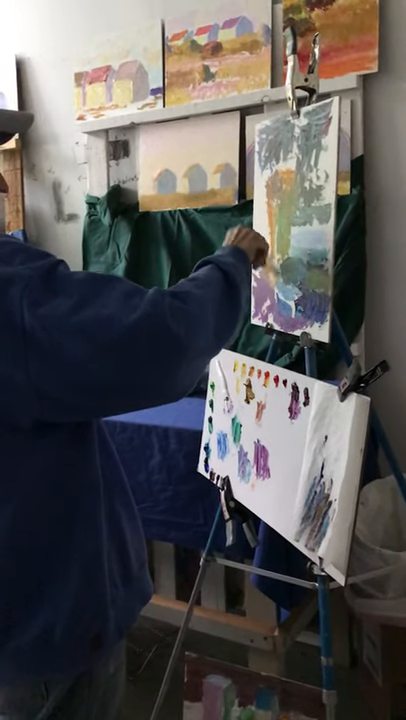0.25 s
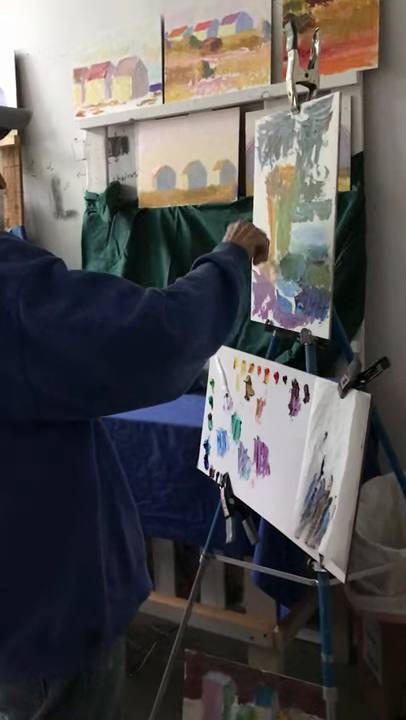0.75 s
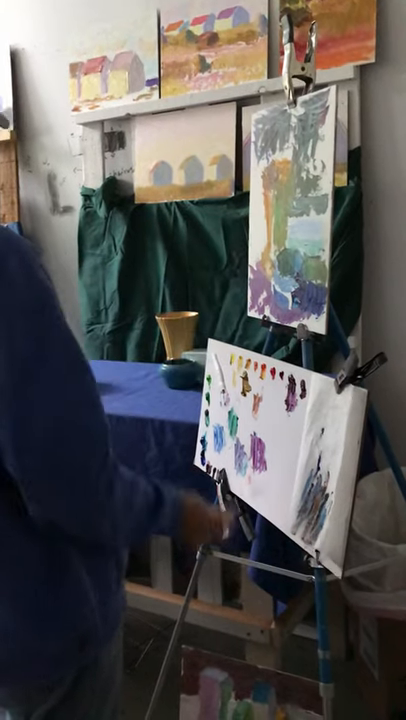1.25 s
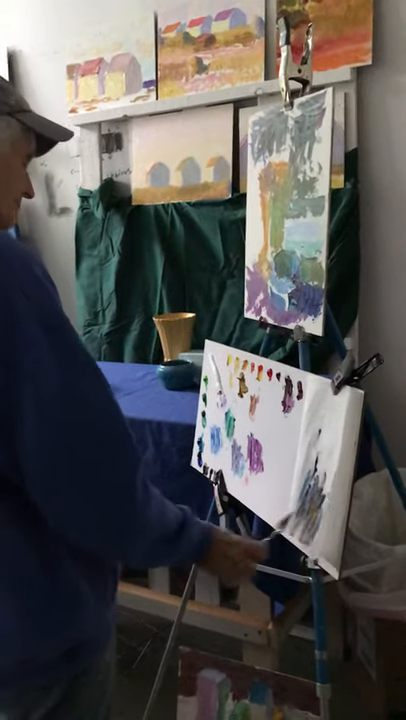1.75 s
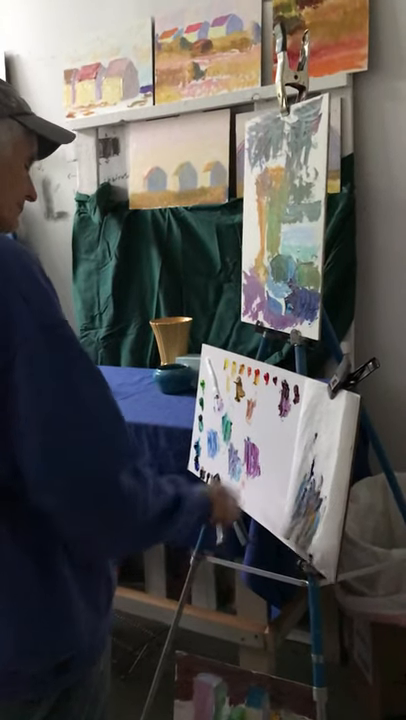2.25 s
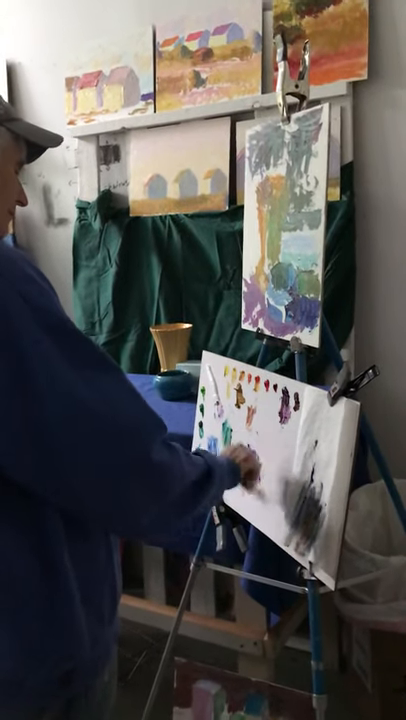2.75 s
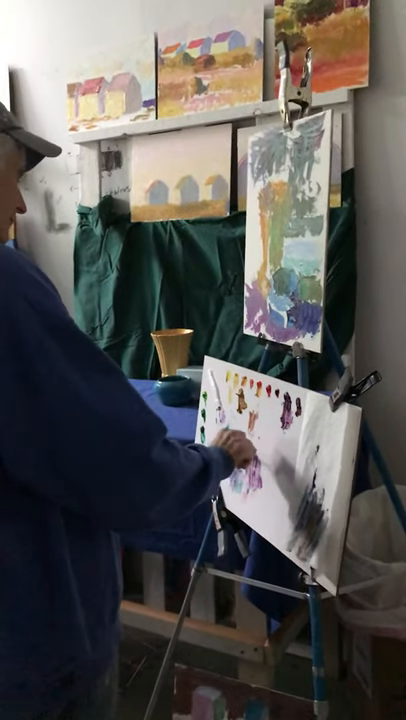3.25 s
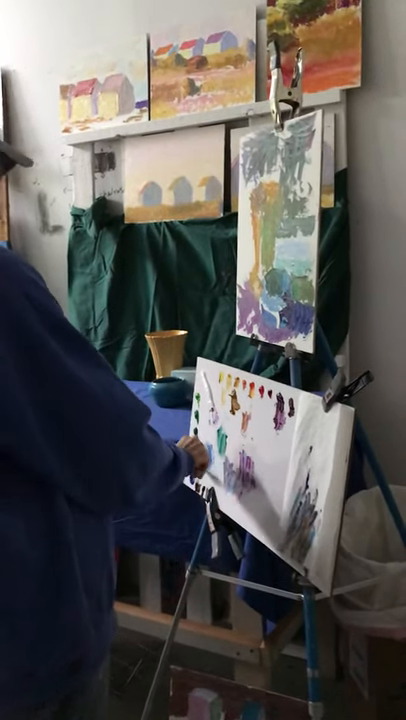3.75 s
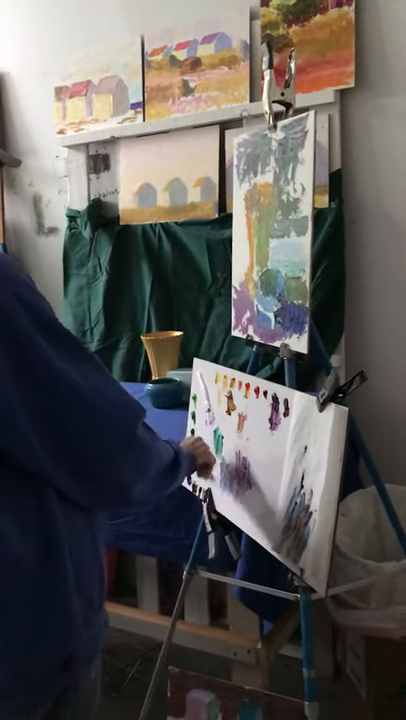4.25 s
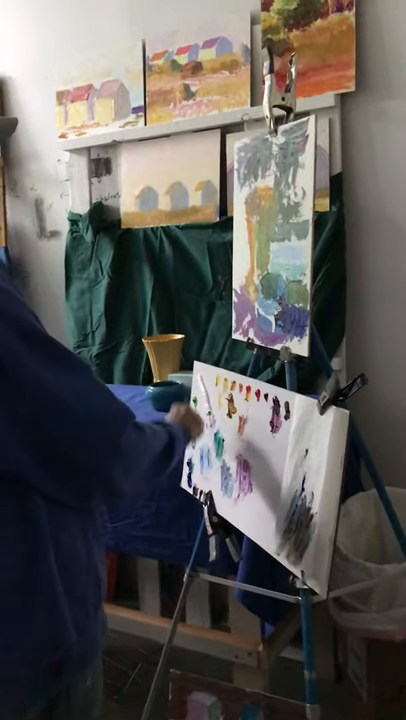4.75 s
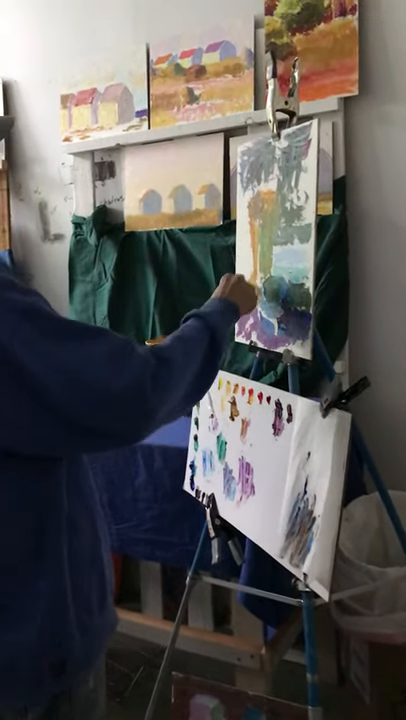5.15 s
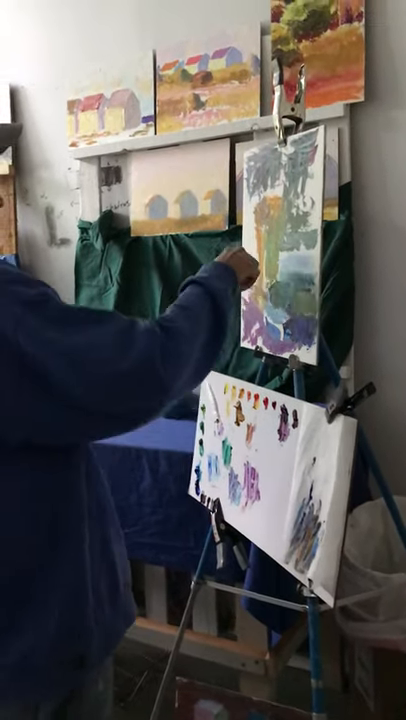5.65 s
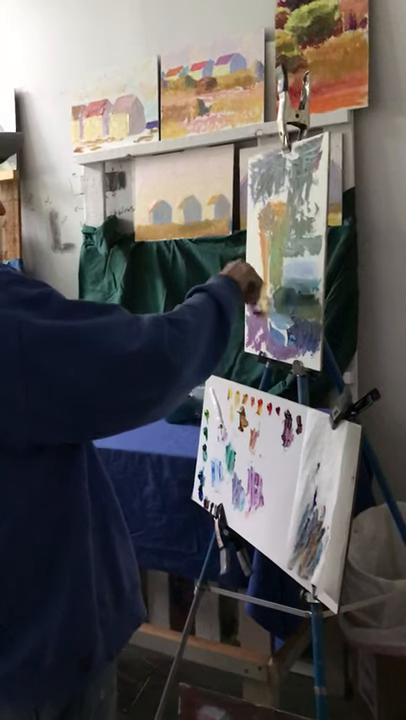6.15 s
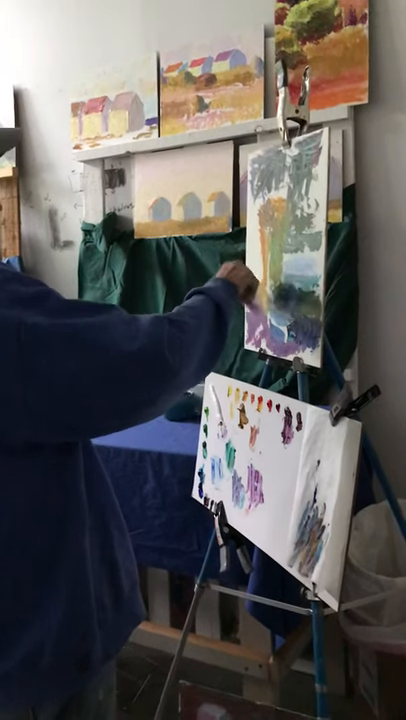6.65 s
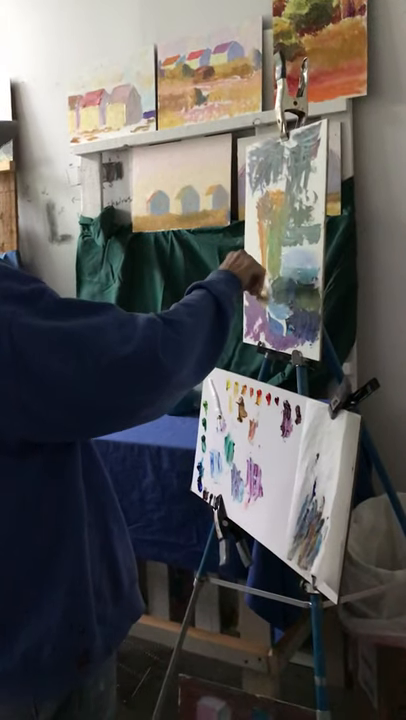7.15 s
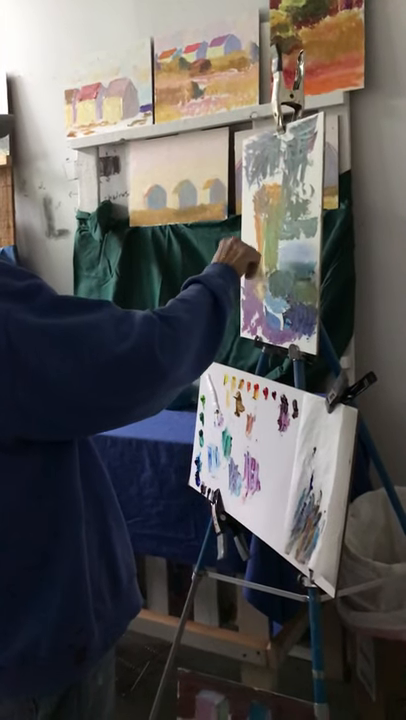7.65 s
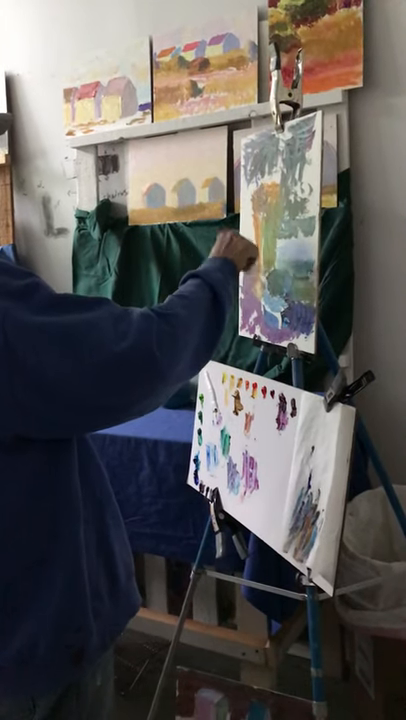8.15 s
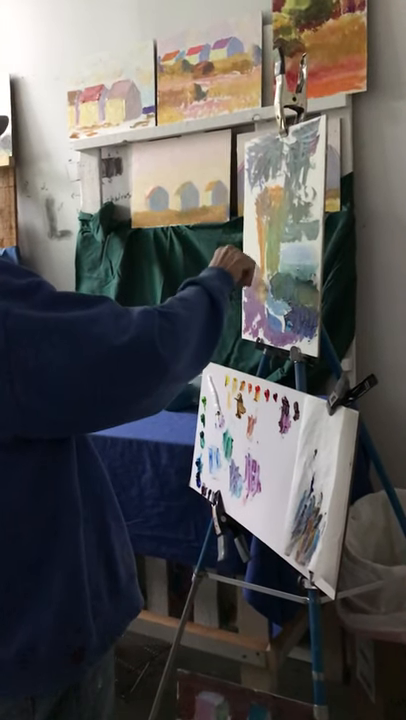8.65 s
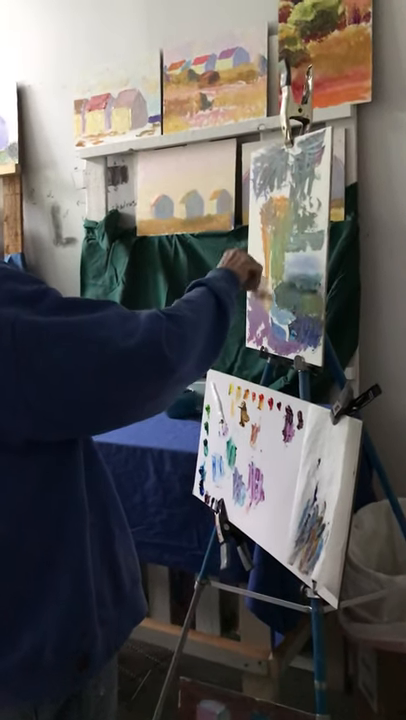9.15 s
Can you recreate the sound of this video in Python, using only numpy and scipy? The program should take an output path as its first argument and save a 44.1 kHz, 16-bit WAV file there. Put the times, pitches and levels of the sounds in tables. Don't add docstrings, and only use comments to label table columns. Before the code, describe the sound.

Dry scratchy painting strokes, each a small snap followed by a brief rasp, heard from about two metres on a phone in a small lightly reverberant room. A first quick run, near silence, one hard bright knock with a short rattle, quiet palette dabs, then a long regular run on canvas that softens, pauses and ends weakly. Steady soft air noise and low hum underneath.

```python
import sys
import numpy as np
from scipy import signal
from scipy.fft import rfft, irfft, next_fast_len
from scipy.io import wavfile
from scipy.ndimage import uniform_filter1d

SR = 44100
rng = np.random.default_rng(int(sys.argv[2]) if len(sys.argv) > 2 else 0)


def how_loud(loudness_db):
    steps = np.asarray(loudness_db, float) / 20
    return 10 ** steps


def generate_wav(signal):
    frames = np.transpose(np.atleast_2d(signal))
    scaled = np.clip(frames, -1, 1) * 32767
    pcm = np.round(scaled).astype(np.int16)
    wavfile.write(sys.argv[1], SR, pcm)


N = 414099
BANDS_HZ = 280 * 2 ** np.arange(0, 6, 1 / 3)
PATCHES_HZ = np.append(280 * 2 ** np.arange(0, 3.4, 1 / 3), np.arange(3500, 17000, 750))
STEP = 16
LONGEST = SR // 2


def on_log(hz, table):
    points_hz, values = np.transpose(table)
    return np.interp(np.log(hz), np.log(points_hz), values)


def band(x, hz, width):
    g = 1 / (1 + np.tan(np.pi * width / SR))
    return signal.lfilter([1 - g, 0, g - 1], [1, -2 * g * np.cos(2 * np.pi * hz / SR), 2 * g - 1], x)


def steep(x, hz, width):
    return band(band(x, hz, 1.55 * width), hz, 1.55 * width)


def unit(x):
    return x / np.sqrt(np.mean(x ** 2))


def even(x):
    size = 2 * len(x)
    spec = rfft(x, size)
    power = np.abs(spec) ** 2
    fine = uniform_filter1d(power, int(150 * size / SR))
    broad = uniform_filter1d(power, int(1200 * size / SR))
    return irfft(spec * np.sqrt(broad / fine))[:len(x)]


def walk(rate, size):
    k = int(SR / rate)
    held = np.repeat(rng.standard_normal(size // k + 1), k)
    return uniform_filter1d(uniform_filter1d(held, k), k)[:size]


def tilt(hz, low_db, high_db):
    low_share = np.interp(np.log(hz), np.log([1900, 3200]), [1, 0])
    high_share = np.interp(np.log(hz), np.log([7500, 11000]), [0, 1])
    return low_db * low_share + high_db * high_share


def add(track, s, x):
    i = max(int(s * SR), 0)
    track[i:i + len(x)] += x[:len(track) - i]


# frequency in Hz, level in dB per Hz.
AIR_COLOUR = [(20, -25.5), (31, 1.5), (42, 7), (62, -3.5), (80, 1.5), (120, -0.5), (260, 3), (420, -3),
              (800, -3), (1350, -0.5), (1900, -5), (4000, -13), (8000, -21.5), (15500, -31.5)]
# time in seconds, level in dB.
AIR_LEVEL = [(0.0, -56.5), (0.42, -54.5), (1.39, -59.5), (3.32, -56.5), (5.2, -57), (5.93, -56),
             (6.61, -58), (7.56, -57), (8.42, -58.5), (9.39, -57)]
# time in seconds, level in dB.
HUM_LEVEL = [(0.0, -58.5), (5.7, -57), (6.1, -60), (9.39, -59)]


def air():
    t, size = np.arange(N) / SR, next_fast_len(N)
    hz = np.maximum(np.fft.rfftfreq(size, 1 / SR), 1)
    spec = rfft(rng.standard_normal(size)) * how_loud(on_log(hz, AIR_COLOUR)) * (hz > 15)
    noise = irfft(spec, size)[:N]
    noise_db = np.interp(t, *np.transpose(AIR_LEVEL)) + 3.0 + 0.13 * walk(8.4, N)
    motor_hz = 53.2 + 2.56 * walk(5.3, N)
    hum = np.sin(2 * np.pi * np.cumsum(motor_hz) / SR)
    hum_db = np.interp(t, *np.transpose(HUM_LEVEL)) + 2 * walk(6.0, N) + 1.49 * walk(15, N)
    return unit(noise) * how_loud(noise_db) + hum * how_loud(hum_db)


# frequency in Hz, time to fall 60 dB in seconds.
ROOM_T60 = [(300, 0.64), (1500, 0.38), (4000, 0.51), (9000, 0.23), (15000, 0.092)]


def room(x, gap_s=0.00043):
    t = np.arange(int(.6 * SR)) / SR
    noise = rng.standard_normal(len(t)) * np.clip((t - gap_s) / 0.0023, 0, 1)
    tail = sum(band(noise, hz, hz / 3) * 1000. ** (-t / on_log(hz, ROOM_T60)) for hz in BANDS_HZ)
    tail = even(tail)
    return signal.fftconvolve(x, tail / np.sqrt(np.sum(tail ** 2)))[:N]


# time in seconds, peak in dB, centre in Hz.
THUDS = [
    (0.197, -46, 383),
    (0.889, -52.5, 350),
    (6.639, -49.5, 320),
    (8.85, -52, 178),
]


def thuds(swell_s=0.053, width=100.0):
    out, t = np.zeros(N), np.arange(SR // 4) / SR
    swell = t / swell_s * np.exp(1 - t / swell_s)
    for s, db, hz in THUDS:
        rumble = unit(band(rng.standard_normal(len(t)), hz, width))
        add(out, s - swell_s / 2, how_loud(db - 6.5) * rumble * swell)
    return out


# time in seconds, peak in dB.
KNOCK = [
    (2.015, -13.5),
]
# frequency in Hz, width in Hz, level in dB.
TRAY_MODES = [(735, 61, -7), (1270, 77, -4), (1720, 160, 3.5), (2840, 79, 6), (2960, 90, -3), (2900, 99, 7),
              (3120, 108, 10), (4020, 260, 3.5), (4350, 70, -5), (6050, 120, -4), (6520, 200, -4),
              (8400, 96, 0), (10900, 360, -3)]
# frequency in Hz, level in dB per Hz.
TRAY_CRACK = [(300, -30), (700, -8), (1500, -11), (2250, -6), (3000, -24), (5000, -7), (9000, -3.5),
              (16000, 7)]


def knock(rattle_s=0.013, tail_s=0.0015, shake_s=0.024, shake_db=-9.0, modes_db=-2.5, gain_db=4.0):
    out, t = np.zeros(N), np.arange(SR // 2) / SR
    blow = 1.3 * np.exp(-t / 0.0023)
    blow += np.exp(-t / 0.016 - np.maximum(t - rattle_s, 0) / tail_s)
    blow += how_loud(shake_db) * np.exp(-t / shake_s)
    rattle = even(rng.standard_normal(len(t)) * np.minimum(t / 0.0015, 1) ** 2 * blow)
    crack = sum(how_loud(on_log(hz, TRAY_CRACK)) * band(rattle, hz, hz / 3) for hz in BANDS_HZ)
    modes = sum(how_loud(db) * band(rattle, hz, w) for hz, w, db in TRAY_MODES)
    sound = unit(crack) + how_loud(modes_db) * unit(modes)
    for s, db in KNOCK:
        add(out, s - .001, how_loud(db + gain_db) * sound / np.abs(sound).max())
    return out


# time in seconds, peak in dB, strongest ring in Hz, lows in dB, highs in dB.
TICKS = [(0.1564, -26.5, 4450, -10.5, -18), (0.3856, -24, 4100, -8, -17), (0.629, -30.5, 4310, -16, -20),
         (0.8616, -24, 3600, -10, -16), (2.5381, -27.5, 4030, -8, -20), (2.834, -31, 8150, -13, -22),
         (3.1993, -25.5, 3900, -11, -21), (3.9684, -35.5, 4510, -9, -14), (4.3044, -32, 4310, -16, -15),
         (4.611, -25, 6100, -22, -12), (5.8745, -31, 5910, -23, -13.5), (6.13, -23.5, 4310, -36, -15),
         (6.3605, -30, 4310, -11, -10), (6.6004, -26.5, 4350, -23, -10), (6.8565, -23, 4310, -25, -30),
         (7.093, -34, 3060, -2, -17), (7.3304, -37, 2990, -2, -25), (7.6066, -37, 3620, -12, -29),
         (7.8176, -41, 2990, -19, -21), (8.061, -38, 5610, -9, -23), (9.0756, -30, 4310, -17, -17),
         (9.3507, -37, 2860, -45, -22)]
# time in seconds, peak in dB, ring in Hz, lows in dB, highs in dB.
LIFTS = [(1.664, -48, 2910, -20, -28), (1.8063, -48.5, 2990, -2, -17), (1.985, -47.5, 2920, -24, -6),
         (2.7384, -45.5, 6150, -16, -18), (3.0612, -40.5, 5700, -12, -20), (4.1987, -43.5, 5380, -6, -17),
         (5.1484, -55, 3520, -10, -15), (5.2916, -39, 5400, -6, -16.5), (5.5384, -50, 3260, -12, -17),
         (6.2687, -44, 4340, -10, -24), (6.5084, -40, 4350, -21, -20), (7.2327, -32.5, 3040, -9, -29),
         (7.465, -41.5, 5640, -10, -26), (7.7059, -32.5, 4380, -17, -22), (7.9513, -45, 4340, -7, -12),
         (8.0883, -41, 2990, 0, -25), (8.201, -51, 3630, -11, -16), (8.955, -40.5, 3570, 2, -22),
         (9.2356, -36, 2990, -9, -17)]
# frequency in Hz, width in Hz, level in dB.
LATER_MODES = [(1493, 50, -10), (1735, 60, 3.5), (1897, 60, 9), (2420, 130, 11), (3060, 93, 9),
               (3690, 31, 5.5), (4310, 48, 1), (5640, 73, -16)]


def ticks(table, contact_s, gain_db, ring_db):
    out, t = np.zeros(N), np.arange(1300) / SR
    touch_s = .0007
    for s, db, ring_hz, low_db, high_db in table:
        lows, highs = low_db + 8.5, high_db + 17.5
        contact = rng.standard_normal(len(t)) * np.sqrt(t) * np.exp(-1.5 * t / contact_s)
        contact = unit(contact) + how_loud(24.5) * (np.abs(t - touch_s) < .5 / SR)
        spot_db = 4.5 * rng.standard_normal(len(PATCHES_HZ)) + tilt(PATCHES_HZ, lows, highs)
        spot_db -= 16.0 * np.clip(PATCHES_HZ / 4000 - 3, 0, 1)
        crack = sum(how_loud(g) * steep(contact, hz, min(hz / 3, 1000))
                    for g, hz in zip(spot_db, PATCHES_HZ) if hz > 1300)
        blade = sum(how_loud(g + tilt(hz, lows, 0)) * band(contact, hz, 220) for hz, _, g in LATER_MODES)
        ring = band(contact, ring_hz, 300)
        tick = unit(crack) + how_loud(-13.5) * unit(blade) + how_loud(ring_db) * unit(ring)
        add(out, s - touch_s, how_loud(db + gain_db) * tick / np.abs(tick).max())
    return out


# level in dB, board lows in dB, tip highs in dB, share of bend from 0 to 1.
STROKE_SHAPE = [
    (-12.5, -2.5, -1, 0),
    (2.5, -7.5, -1.5, 0.71),
    (0, -5.5, -0.5, 1),
    (-24.5, -16, -42, 0),
]


def stroke(row, stop_s, straight_tip_hz=5700):
    start_s, rise_s, hold_s, db, tip_hz = row
    level_db, lows, highs, bend = np.transpose(STROKE_SHAPE)
    s = start_s + np.cumsum([0, rise_s, hold_s, stop_s])
    return s, db + level_db, lows, highs, straight_tip_hz + bend * (tip_hz - straight_tip_hz)


def drag(points, modes, colour, ring_db, low_db, high_db, tip_db, tip_width=900., patchy_db=2.4):
    s, level_db, lows, highs, tip_hz = points
    t = np.arange(s[0], s[-1], 1 / SR)
    slow_t = t[::STEP]
    lows = np.interp(slow_t, s, np.minimum(lows - low_db, 11))
    highs = np.interp(slow_t, s, highs - high_db)
    tip_hz = np.interp(slow_t, s, tip_hz)

    def gain(db):
        return np.repeat(how_loud(db), STEP)[:len(t)]

    slip_db = 2.2 * rng.exponential(size=LONGEST) + 2.0 * walk(200, LONGEST)
    slips = (rng.standard_normal(LONGEST) * how_loud(slip_db))[:len(t)]
    parts = [(hz, min(hz / 3, 1000), on_log(hz, colour)) for hz in PATCHES_HZ]
    for hz, w, db in modes:
        spot_hz = hz * (1 + .01 * rng.standard_normal())
        parts.append((spot_hz, max(2 * w, 180), min(db + ring_db, 11 if hz < 2200 else 5.5)))
    out, middle = np.zeros(len(t)), np.zeros(len(t))
    for hz, w, db in parts:
        patchy = patchy_db * walk(40 * STEP, LONGEST // STEP)[:len(slow_t)]
        lift_db = tip_db * np.exp(-((hz - tip_hz) / tip_width) ** 2)
        sound = steep(slips, hz, w) * gain(db + lift_db + patchy)
        out += sound * gain(tilt(hz, lows, highs))
        if 2500 < hz < 9000:
            middle += sound
    press = np.sqrt(uniform_filter1d(middle ** 2, 1500))
    return out / press * how_loud(np.interp(t, s, level_db)) * signal.windows.tukey(len(t), .15)


# start of the slide in seconds,
# speeding up in seconds, full speed in seconds, level in dB, ring of the bent tip in Hz.
FIRST_DRAGS = [(0.0, 0.00082, 0.0025, -37.5, 4530), (.165, 0.033, 0.048, -33.5, 7600),
               (.395, 0.031, 0.044, -35.5, 6870), (.64, 0.039, 0.024, -34, 9100),
               (.866, 0.019, 0.041, -32.5, 8800)]
MIXING_DRAGS = [(2.22, .01, 0.17, -64.5, 5200), (2.548, .004, .11, -49, 6700),
                (2.85, .09, 0.033, -46, 7100), (3.21, .004, .09, -47, 6200)]
LOADING_DRAGS = [(4.01, 0.072, 0.031, -47, 6360), (4.33, 0.043, 0.036, -47.5, 6800),
                 (4.65, 0.073, .025, -49.5, 6500), (5.5, 0.031, .01, -65.5, 5100)]
LATER_DRAGS = [(5.915, 0.031, 0.009, -33.5, 4200), (6.15, 0.039, 0.026, -39, 7400),
               (6.375, 0.038, 0.039, -37.5, 5940), (6.612, 0.027, 0.046, -34.5, 4750),
               (6.875, 0.034, 0.041, -41.5, 7100), (7.11, 0.042, 0.033, -43, 4400),
               (7.335, 0.047, 0.027, -49, 4670), (7.58, .03, .03, -53.5, 5170),
               (7.835, 0.045, 0.016, -55, 4600), (8.105, .03, 0.012, -54, 5300),
               (8.812, 0.051, 0.042, -46.5, 5900), (9.1, 0.044, 0.035, -45, 6800),
               (9.355, 0.0092, .01, -58, 4650)]
# frequency in Hz, width in Hz, level in dB.
FIRST_MODES = [(1530, 50, 2), (1490, 50, -4), (1700, 60, 10.5), (1896, 60, 6), (2460, 66, 8),
               (3040, 61, 9.5), (3730, 45, 7), (4310, 47, 8), (5800, 150, 0.5)]
MIXING_MODES = [(2080, 90, 8), (6360, 320, 0), (9300, 370, -27)]
LOADING_MODES = [(4310, 150, -3), (5980, 410, 8), (6440, 170, 5), (8800, 250, 1), (9300, 860, 7.5)]
# frequency in Hz, level in dB per Hz.
CANVAS = [(250, -39), (400, -15.5), (950, -5.5), (1700, 2.5), (2400, 1), (4300, 6), (7500, 6.5), (10500, 8),
          (13000, 5), (16500, -3.5)]
WET_PAINT = [(710, -40), (1200, 2), (1870, 4), (2530, 14), (2830, 9.5), (9110, 11.5), (16000, -8)]
PALETTE = [(710, -41), (1200, -3), (2950, 8.5), (5020, 9.5), (6580, 0), (7490, -3), (9610, 1), (11700, -3),
           (16000, -8)]


def drags():
    out = np.zeros(N)
    # strokes, modes, colour, then ring, lows, highs and tip in dB, stopping time in seconds
    for rows, modes, colour, ring_db, low_db, high_db, tip_db, stop_s in [
            (FIRST_DRAGS, FIRST_MODES, CANVAS, 0.5, -5.0, -3.0, 5.0, .06),
            (MIXING_DRAGS, MIXING_MODES, WET_PAINT, -3.0, -3.0, -3.0, 3.0, .07),
            (LOADING_DRAGS, LOADING_MODES, PALETTE, -1.5, -8.0, -4.0, 4.0, .07),
            (LATER_DRAGS, LATER_MODES, CANVAS, 0.5, -4.0, -3.0, 4.0, .06)]:
        for row in rows:
            add(out, row[0], drag(stroke(row, stop_s), modes, colour, ring_db, low_db, high_db, tip_db))
    return out


def scene():
    landings = ticks(TICKS, contact_s=0.004, gain_db=-0.5, ring_db=-9.0)
    lifts = ticks(LIFTS, contact_s=0.0084, gain_db=2.0, ring_db=-6.0)
    touches = landings + lifts
    near = drags() + knock()
    echoes = how_loud(-6.0) * room(near + how_loud(1.0) * touches)
    return (near + touches + echoes + thuds() + air())[None]


def band_limit(x):
    return signal.sosfilt(signal.butter(12, 16990, fs=SR, output="sos"), x)


def record(dry):
    dipped = dry - 0.4 * band(dry, 10700.0, 520.0)
    top_cut = signal.ellip(7, .3, 60, 15650, fs=SR, output="sos")
    mix = signal.sosfilt(top_cut, dipped)
    return band_limit(mix)


dry = scene()
out = record(dry)
generate_wav(out)
```